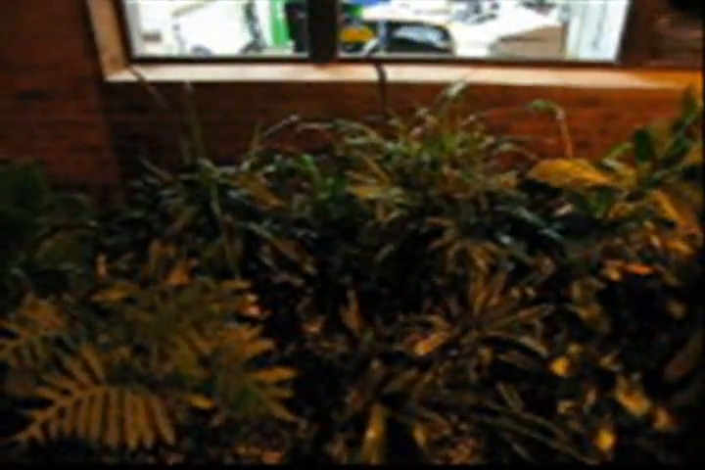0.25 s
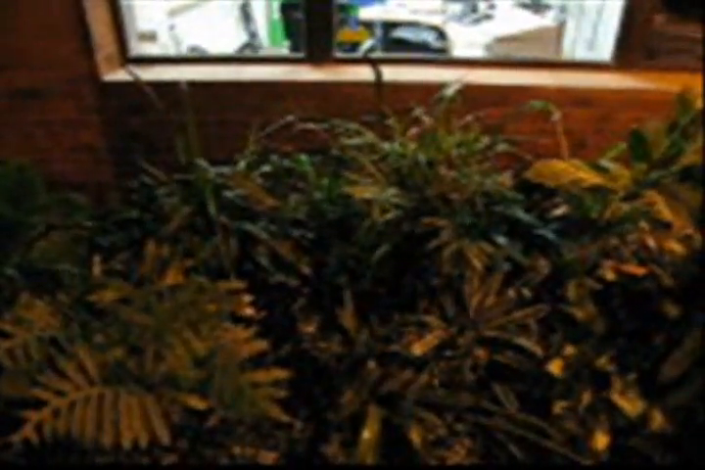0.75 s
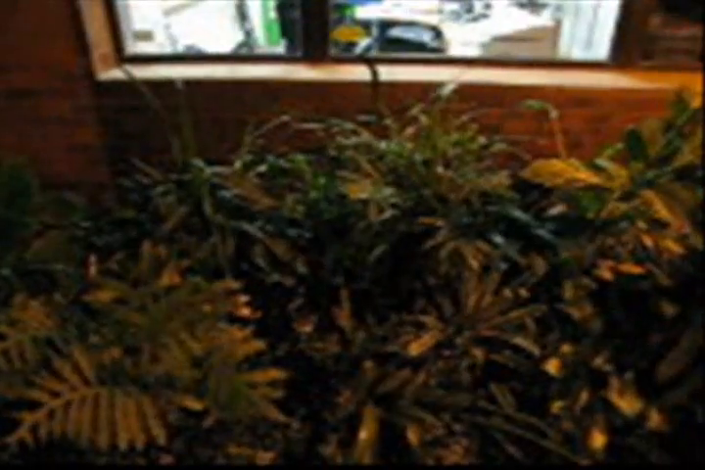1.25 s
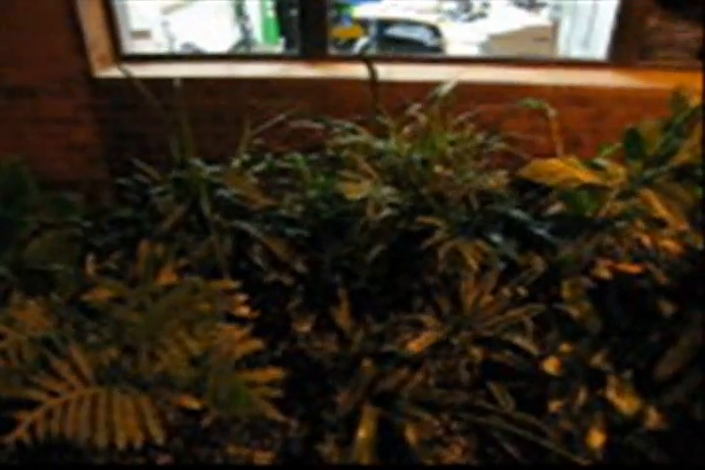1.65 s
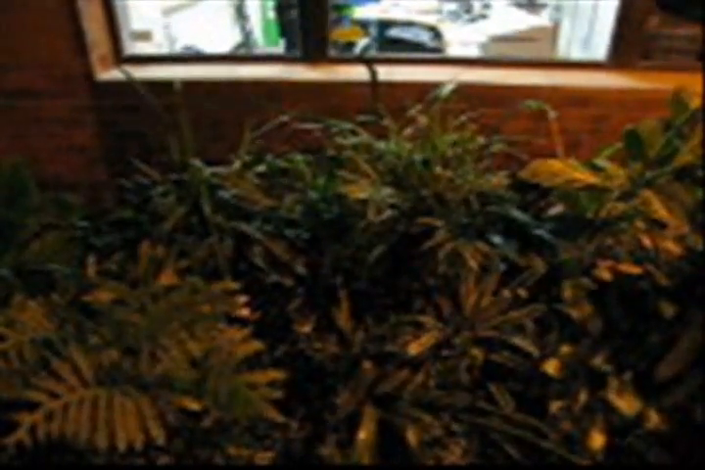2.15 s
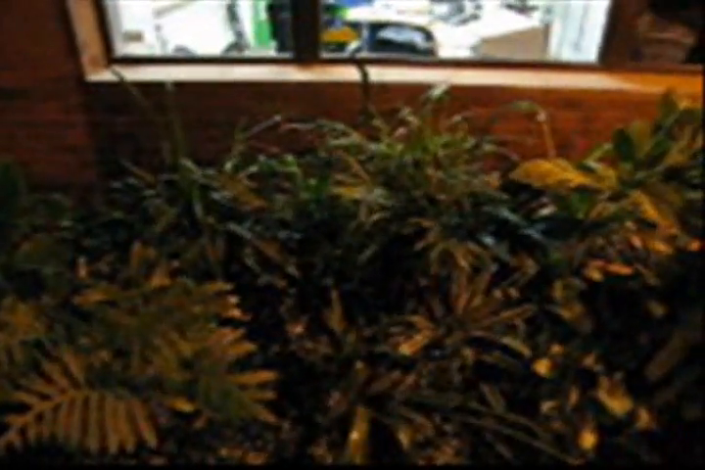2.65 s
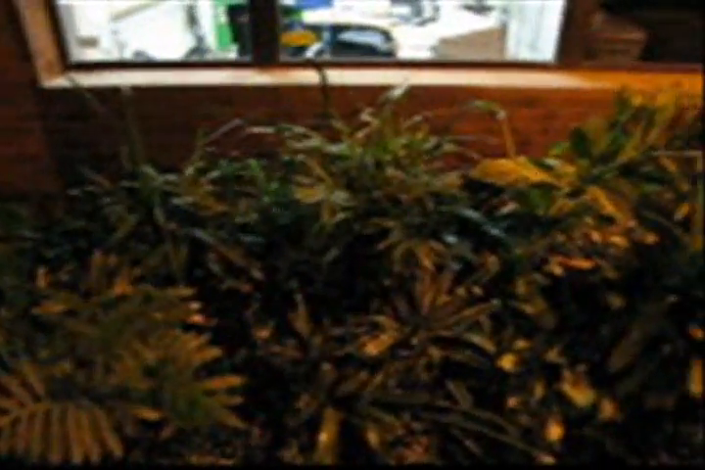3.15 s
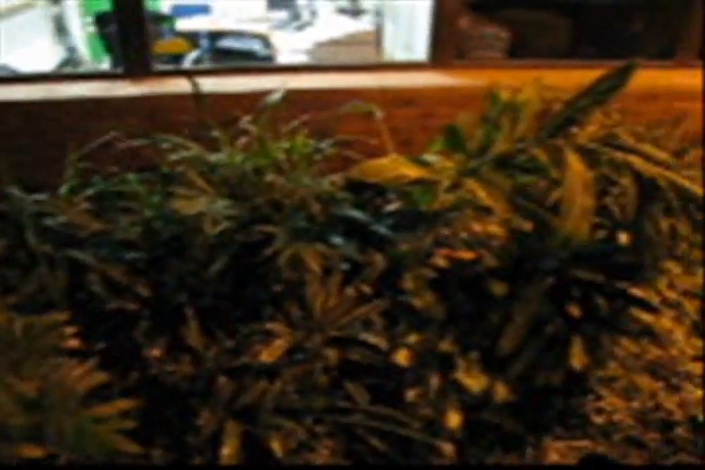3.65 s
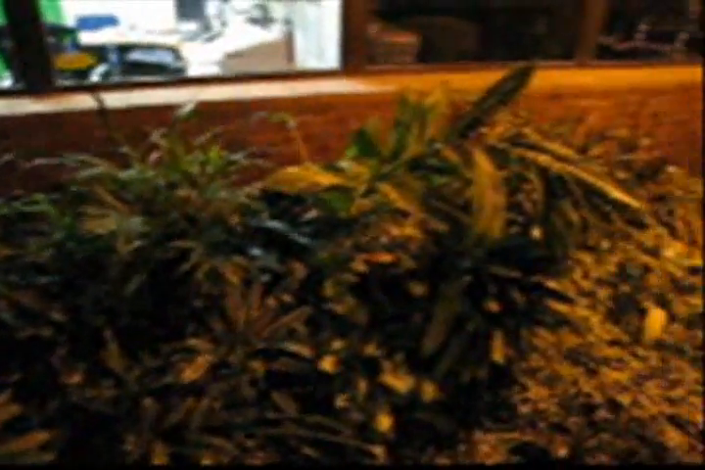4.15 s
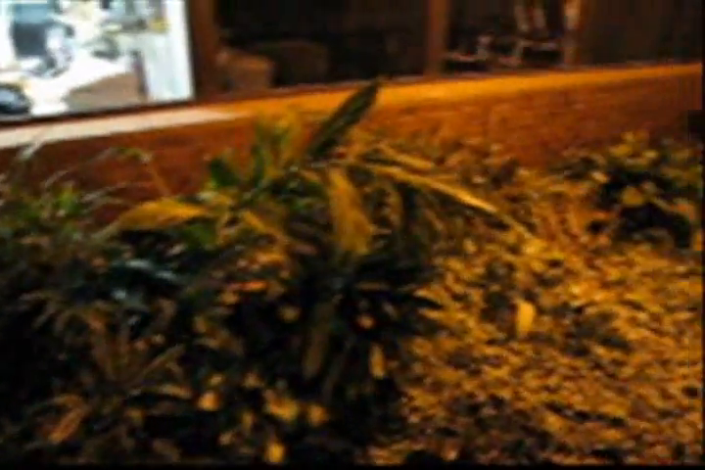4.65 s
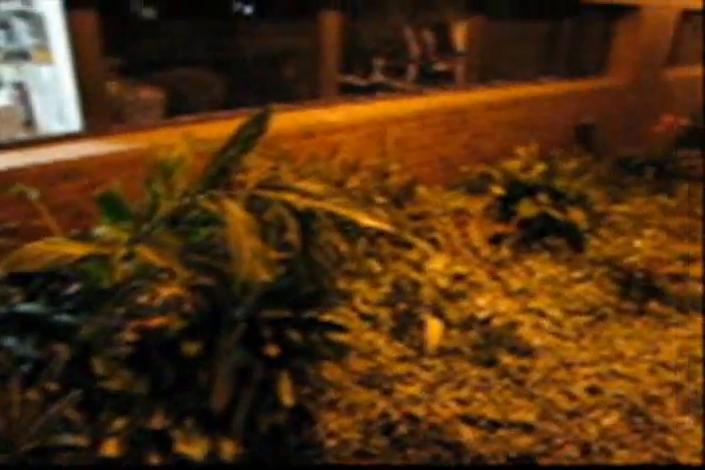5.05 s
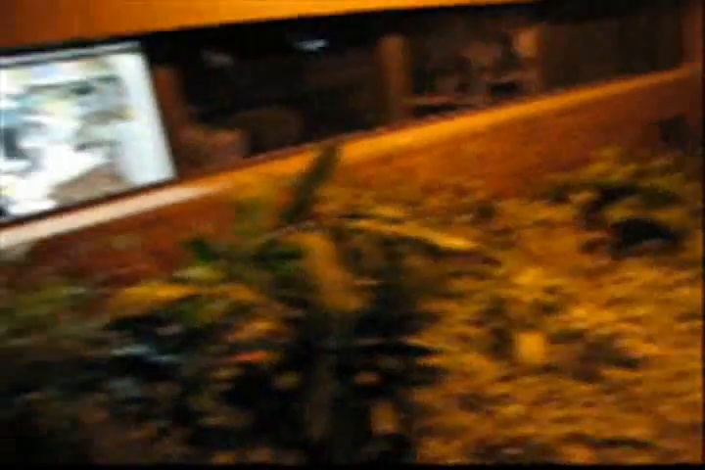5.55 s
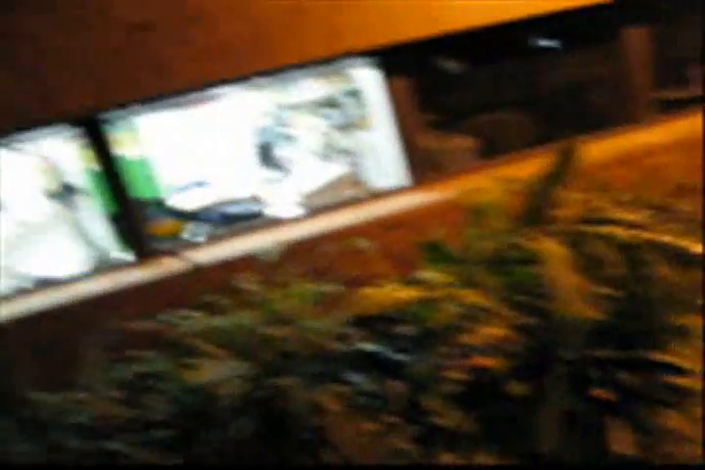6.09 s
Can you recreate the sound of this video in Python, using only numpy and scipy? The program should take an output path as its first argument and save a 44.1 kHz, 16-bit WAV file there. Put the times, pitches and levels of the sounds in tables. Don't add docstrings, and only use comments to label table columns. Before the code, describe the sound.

Over a low, breathing fan hum, frogs exchange two-note calls: a soft short note, then a piercing upward whistle. Three or four loud near calls stand out among scattered, reverberant distant ones. A thin cricket shimmers faintly. A click sounds past the middle, another later, and a hand rustles at the very end. The small camera microphone sounds coarse and bright, ducking after loud whistles.

```python
import sys
import numpy as np
from scipy import signal
from scipy.fft import rfft, irfft
from scipy.io import wavfile
from scipy.ndimage import uniform_filter1d

SR = 44100
rng = np.random.default_rng(int(sys.argv[2]) if len(sys.argv) > 2 else 0)


def store_pcm(level_fs):
    pcm = np.round(np.clip(level_fs, -1, 1) * 32767).astype(np.int16)
    wavfile.write(sys.argv[1], SR, np.atleast_2d(pcm).T)


def makeup_ratio(level_db):
    decades = np.asarray(level_db, float) / 20
    return 10 ** decades


N = 278694


def rms_one(x):
    return x / np.sqrt(np.mean(x ** 2) + 1e-20)


def in_time(rows):
    s, *columns = np.transpose(rows)
    return [np.interp(np.arange(N) / SR, s, c) for c in columns]


def add(track, s, sound):
    at = round(s * SR) + len(track) - N
    track[at:at + len(sound)] += sound[:len(track) - at]


def narrow_noise(hz, width_hz):
    r = np.exp(-np.pi * width_hz / SR)
    poles = [1, -2 * r * np.cos(2 * np.pi * hz / SR), r * r]
    once = signal.lfilter([1, 0, -1], poles, rng.standard_normal(N))
    return rms_one(signal.lfilter([1], poles, once))


def low_note(hz, level_db, fullest, octave_db):
    length_s, edge_s, droop_hz = .108, .005, 30
    rise_db, sag_db, sag_share = 12, 8, .33
    u = np.arange(round(length_s * SR)) / (length_s * SR)
    phase = 2 * np.pi * np.cumsum(hz + droop_hz * (.5 - u)) / SR
    edges = np.clip(np.minimum(u, 1 - u) * length_s / edge_s, 0, 1)
    shape_db = np.interp(u, [0, fullest, fullest + sag_share], [-rise_db, 0, -sag_db])
    fundamental = makeup_ratio(shape_db) * edges * np.sin(phase)
    octave = makeup_ratio(octave_db) * np.sin(np.pi * u) ** 1.5 * np.sin(2 * phase)
    return np.sqrt(2) * makeup_ratio(level_db) * (fundamental + octave)


def whistle(t, length_s, start_hz, end_hz, bend, swell_s, fade_s):
    scoop_hz, scoop_s = 260, .007
    u = np.clip(t, 0, None)
    climb_hz = (end_hz - start_hz) / (1 - np.exp(-bend))
    cycles = start_hz * u + climb_hz * (u - length_s / bend * (1 - np.exp(-bend * u / length_s)))
    cycles += scoop_hz * scoop_s * np.exp(-u / scoop_s)
    envelope = np.clip(t / swell_s, 0, 1) * np.clip((length_s - t) / fade_s, 0, 1)
    return envelope * np.sin(2 * np.pi * cycles)


def reflections(x, t60_s, gap_s):
    t = np.arange(round(1.5 * SR)) / SR
    tail = rng.standard_normal(len(t)) * makeup_ratio(-60 * t / t60_s) * np.clip(t / gap_s - .5, 0, 1)
    return signal.fftconvolve(x, tail / np.sqrt(np.sum(tail ** 2)))[:len(x)]


def frogs():
    calling = {"near": [(.39, .13, -10.5, -15), (2.83, .14, -10.5, -16)],
               "near, camera turned": [(4.575, .15, -11, -13.5)], "bush": [(1.45, .18, -20.5, -29),
               (3.085, .18, -23, -28)], "bush, camera turned": [(5.92, .18, -10.5, -29)],
               "fern": [(.5, .13, -31, -38), (2.25, .14, -29, -40), (3.845, .13, -28, -33),
               (5.735, .11, -37, -45)], "sill": [(-.16, .14, -24, -36), (2.544, .11, -37, -47),
               (5.22, .125, -21, -33)], "high": [(.43, .125, -25, -41), (4.49, .12, -28, -34)],
               "corner": [(1.87, .17, -34, -50), (4.02, .15, -29, -39)], "far": [(1.945, .12, -39, -38),
               (3.946, .13, -33, -38), (4.1, .12, -35, -42), (5.965, .12, -33, -33)]}
    voices = {"near": (2394, 2970, 2.6), "near, camera turned": (2350, 2969, 3.39),
              "bush": (2271, 2915, 1.56), "bush, camera turned": (2196, 2935, 1.87),
              "sill": (2407, 3023, .64), "fern": (2290, 2770, 2.8), "high": (2550, 3240, 1.5),
              "corner": (2620, 3035, 1.8), "far": (2390, 2680, 1.6)}
    low_voices = {"near": (1540, .236, .1, -13, -10), "near, camera turned": (1538, .232, .55, -17, -14),
                  "bush": (1536, .25, .12, -19, -7), "bush, camera turned": (1545, .235, .15, -19, -9),
                  "fern": (1505, .25, .15, -40, -9), "sill": (1555, .245, .3, -18, -7),
                  "high": (1655, .228, .6, -28, -14), "corner": (1485, .225, .3, -35, -10),
                  "far": (1485, .236, .2, -30, -9)}
    perches = {"near": (.028, .012, -15.5, -21), "near, camera turned": (.026, .017, -16, -21),
               "bush": (.075, .02, -6, -15), "bush, camera turned": (.2, .04, -14, -24),
               "sill": (.03, .009, -5, -14), "fern": (.05, .03, 1.5, -8), "high": (.07, .026, -4, -11),
               "corner": (.12, .02, 1.5, -9), "far": (.1, .02, 5, -4)}
    perch_echoes = {"near": [(6.025, 0.5), (17.425, 0.25), (28.4, 0.35), (28.925, 0.15), (31.7, 0.25)],
                    "near, camera turned": [(2.9, 0.15), (8.075, 0.35), (12.0, 0.15), (16.025, 0.15),
                    (20.15, 0.15)], "bush": [(2.15, .55), (3.9, .55), (10.7, .55), (19.3, .3), (27.65, .3),
                    (43.525, .2)], "sill": [(2.875, .2), (6.1, .3), (9.075, .2), (11.5, .3), (19.475, .3),
                    (29.9, .2)], "bush, camera turned": [(4.775, .4), (10.325, .3), (12.675, .2),
                    (17.175, .2), (41.95, .3), (44.3, .3)]}
    leaf_echo_ms, leaf_echo_gain = 32, .42
    spread_swell_s, spread_fade_s = .04, .022
    low_hall_db, octave_beam_db = -3, 8
    hall_t60_s, hall_gap_s = .89, .05
    wall_s, wall_t60_s, wall_gap_s = .105, .22, .01
    lead_in = SR // 2

    near, hall, wall = np.zeros((3, N + lead_in))
    t = np.arange(round(SR / 4)) / SR
    for name, calls in calling.items():
        low_hz, lead_s, fullest, octave_db, low_wet_db = low_voices[name]
        swell_s, fade_s, hall_db, wall_db = perches[name]
        for s, length_s, peak_db, low_db in calls:
            chance = rng.random(size=(6, 2)) * [leaf_echo_ms, leaf_echo_gain] + [2, leaf_echo_gain / 2]
            for ms, gain in [(0, 1), *perch_echoes.get(name, chance)]:
                path = whistle(t - ms / 1000, length_s, *voices[name], swell_s, fade_s)
                add(near, s, makeup_ratio(peak_db) * gain * path)
            spread = makeup_ratio(peak_db) * whistle(t, length_s, *voices[name], spread_swell_s, spread_fade_s)
            low = low_note(low_hz, low_db, fullest, octave_db)
            low_spread = low_note(low_hz, low_db, fullest, octave_db - octave_beam_db)
            for track, wet_db, share_db in ((hall, hall_db, low_hall_db), (wall, wall_db, 0)):
                add(track, s, makeup_ratio(wet_db) * spread)
                add(track, s - lead_s, makeup_ratio(low_wet_db + share_db) * low_spread)
            for ms, gain in [(0, 1), *([] if "near" in name else chance)]:
                add(near, s - lead_s + ms / 1000, gain * low)
    late = np.roll(reflections(wall, wall_t60_s, wall_gap_s), round(wall_s * SR))
    return (near + late + reflections(hall, hall_t60_s, hall_gap_s))[lead_in:]


def fan():
    # (t/s, hum level/dB, air level/dB)
    fan_drift = [(0.0, -27, -34), (.3, -26, -35), (.65, -28, -36.5), (.95, -28, -35.5),
                 (1.15, -25.5, -34.5), (1.38, -28.5, -33.5), (1.6, -25, -34), (2.1, -24.5, -33),
                 (2.3, -27, -32.5), (2.45, -22.5, -32.5), (2.8, -25.5, -33.5), (3.0, -29.5, -36),
                 (3.4, -26.5, -35), (4.0, -23.5, -33), (4.35, -24, -33.5), (4.6, -28, -35), (5.4, -26, -34),
                 (6.32, -27.5, -32.5)]
    # (f/Hz, density/dB per Hz)
    air_spectrum = [(12, -47.5), (20, -7), (90, -9.5), (146, -5), (169, -14), (194, -11.5), (519, -21),
                    (626, -19.5), (1290, -25), (1520, -25.5), (1970, -28.5), (2740, -27.5), (5400, -35.5),
                    (7020, -44.5), (11900, -120)]
    # (f/Hz, width/Hz, level/dB)
    air_bumps = [(27.1, 12, -38.5), (246.2, 9.1, -46), (2750, 500, -47.5), (1519, 60, -52.5),
                 (4873, 200, -51.5)]
    hum_hz, wander_db = 144.42, 1.44
    hum_db, air_db = in_time(fan_drift)
    hum_db = hum_db + wander_db * narrow_noise(4.0, 5.0)
    hum = np.sqrt(2) * makeup_ratio(hum_db) * np.sin(2 * np.pi * hum_hz * np.arange(N) / SR)
    f = np.maximum(np.fft.rfftfreq(N, 1 / SR), 1)
    knot_hz, knot_db = np.array(air_spectrum).T
    colour = makeup_ratio(np.interp(np.log(f), np.log(knot_hz), knot_db))
    air = irfft(rfft(rng.standard_normal(N)) * colour, N)
    middle = signal.sosfilt(signal.butter(4, [250, 1300], "band", fs=SR, output="sos"), air)
    air = air / np.std(middle) * makeup_ratio(air_db)
    bumps = sum(makeup_ratio(level_db) * narrow_noise(hz, width_hz) for hz, width_hz, level_db in air_bumps)
    return hum + air + bumps


def cricket():
    # (t/s, level/dB)
    song_levels = [(0.0, -49.5), (2.4, -47.5), (3.5, -50), (4.3, -45.5), (5.3, -44), (6.32, -46)]
    wander_db, stroke_hz, tone_hz = 1.8, 32.0, 3547
    t = np.arange(N) / SR
    strokes = 1 + 0.25 * np.sin(2 * np.pi * stroke_hz * t)
    tone = np.sin(2 * np.pi * tone_hz * t + 2.5 * narrow_noise(6.3, 8.0))
    level_db = in_time(song_levels)[0] + wander_db * narrow_noise(3.0, 4.0)
    haze = narrow_noise(3560, 110)
    return makeup_ratio(level_db) * rms_one(strokes * (haze + .6 * tone))


def handling():
    # (t/s, peak/dB, f/Hz, t60/ms)
    housing_ticks = [
        (3.5567, -10.5, 3020, 1.7),
        (3.558, -21, 4500, 7.3),
        (5.443, -8, 4800, 1.6),
    ]
    # (t/s, level/dB)
    hand_rustle = [
        (6.2, -52),
        (6.27, -43),
        (6.32, -29.5),
    ]
    out = makeup_ratio(in_time(hand_rustle)[0]) * narrow_noise(4200, 3800)
    t = np.arange(round(SR / 50)) / SR
    for s, peak_db, hz, t60_ms in housing_ticks:
        add(out, s, makeup_ratio(peak_db - 60000 * t / t60_ms) * np.sin(2 * np.pi * hz * t))
    return out


def scene():
    return (frogs() + fan() + cricket() + handling())[None]


def gain_control(x, knee_db, slope, lag_s, attack_s, release_db_s):
    bright = np.diff(x, prepend=0) * 2.5
    level_db = 10 * np.log10(uniform_filter1d(bright ** 2, size=661) + 1e-9)
    ramp_db = release_db_s * np.arange(N) / SR
    cut_db = np.maximum.accumulate(slope * np.maximum(level_db - knee_db, 0) + ramp_db) - ramp_db
    cut_db = np.interp(np.arange(N) - lag_s * SR, np.arange(N), cut_db)
    r = np.exp(-1 / (attack_s * SR))
    return x * makeup_ratio(-signal.lfilter([1 - r], [1, -r], cut_db))


def sample_and_hold(x):
    hold_hz, hold_phase, step = 11026.0, .02, 1 / 128
    taken = (np.floor(np.arange(N) * hold_hz / SR + hold_phase) - hold_phase) * SR / hold_hz
    return np.round(np.interp(taken, np.arange(N), x) / step) * step


def top_cut(x):
    return signal.sosfilt(signal.butter(12, 15910, fs=SR, output="sos"), x)


def record(dry):
    x = gain_control(dry[0] * makeup_ratio(1.0), knee_db=-21.0, slope=0.54, lag_s=.007, attack_s=.007,
                     release_db_s=74.0)
    x = signal.sosfilt(signal.cheby1(8, .1, 5480, fs=SR, output="sos"), x)
    held = sample_and_hold(x)
    return top_cut(held[None])


dry = scene()
out = record(dry)
store_pcm(out)
```